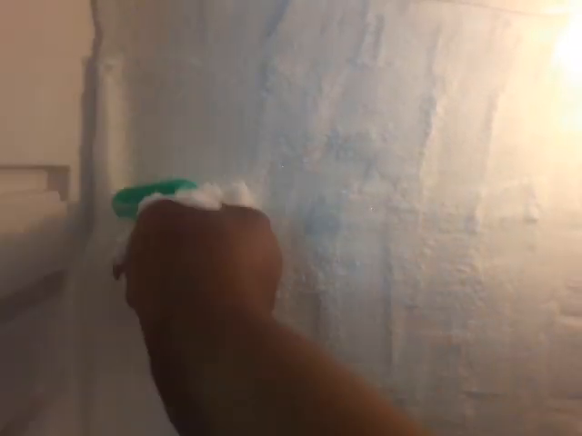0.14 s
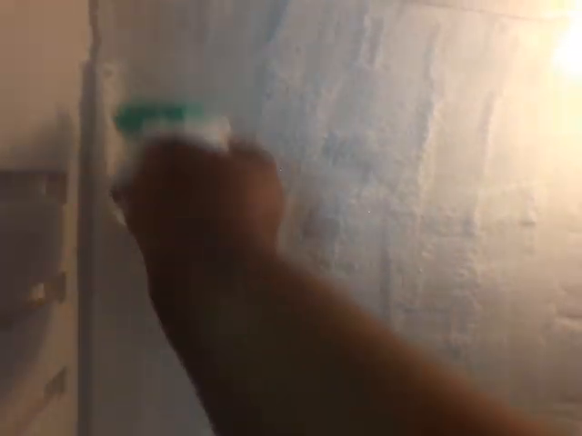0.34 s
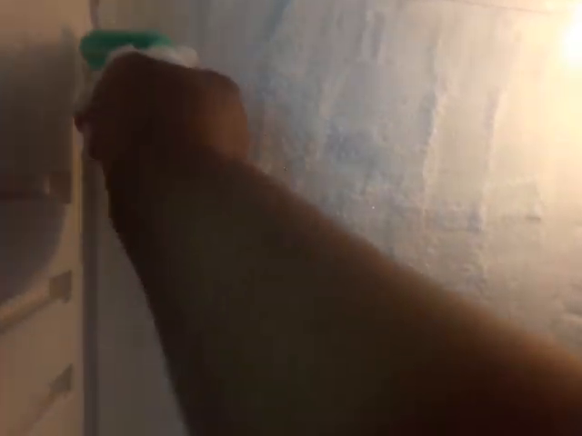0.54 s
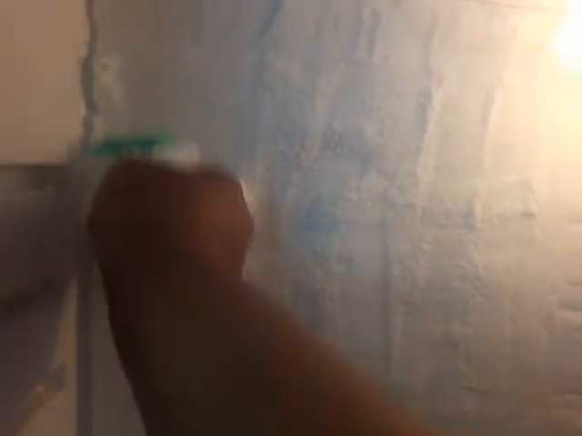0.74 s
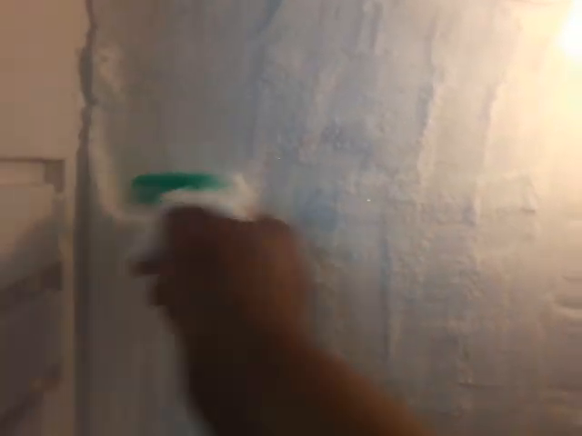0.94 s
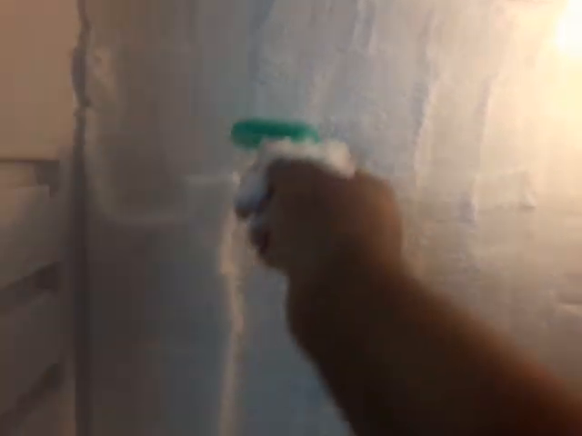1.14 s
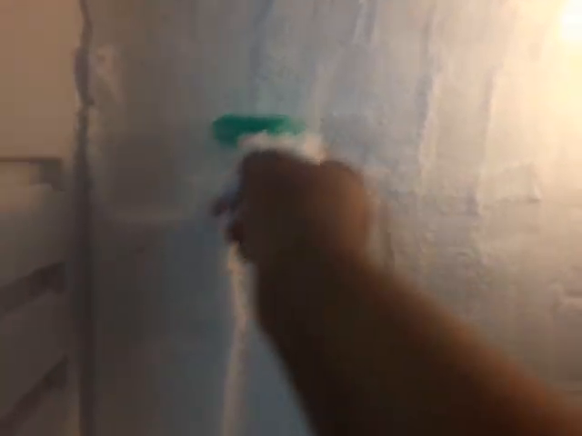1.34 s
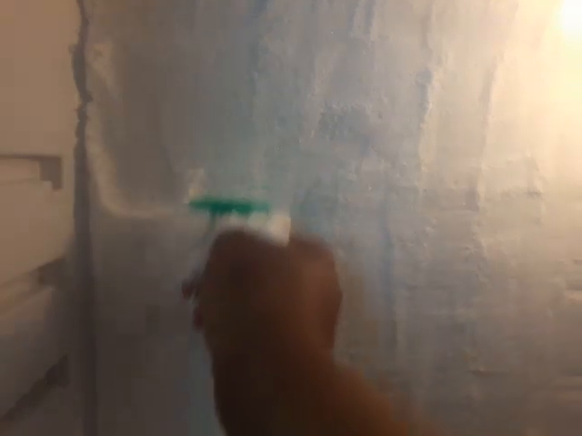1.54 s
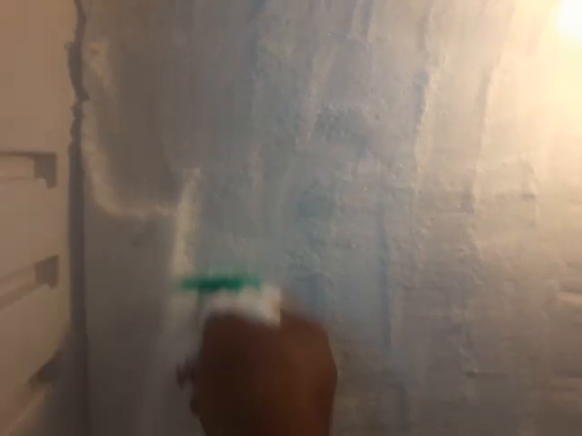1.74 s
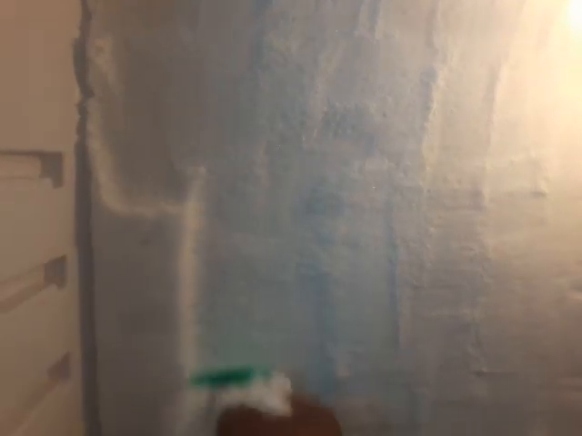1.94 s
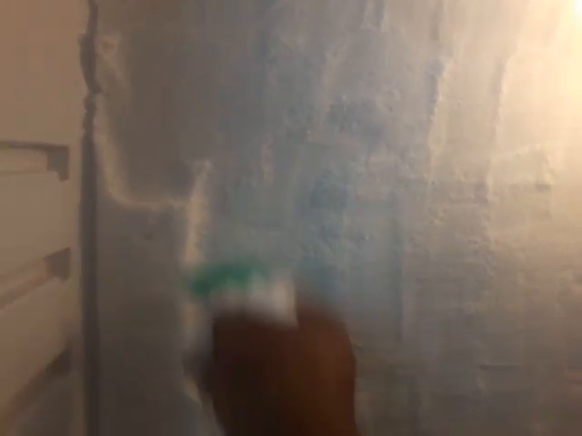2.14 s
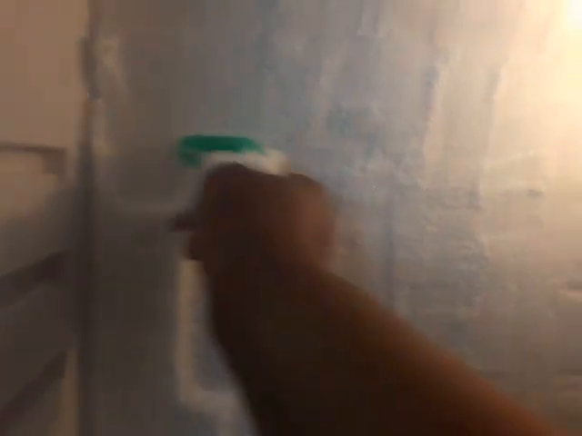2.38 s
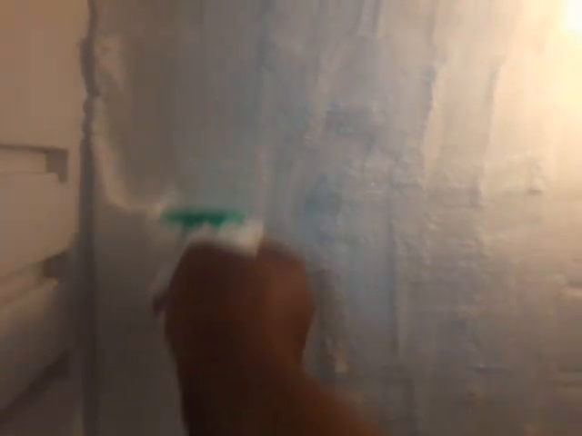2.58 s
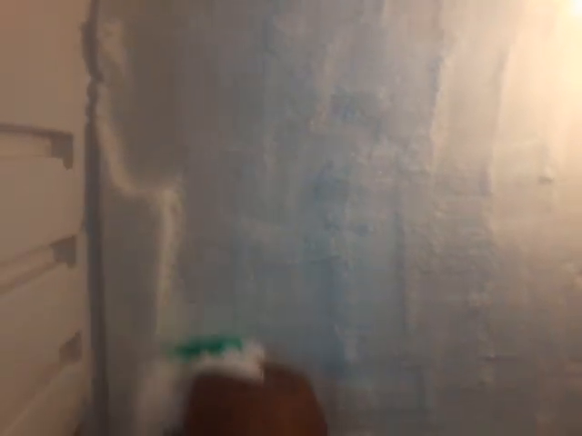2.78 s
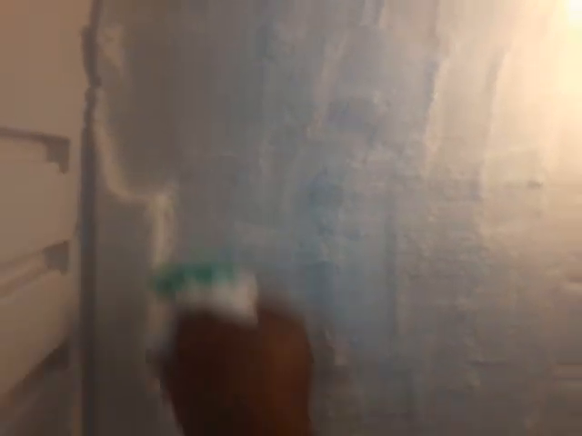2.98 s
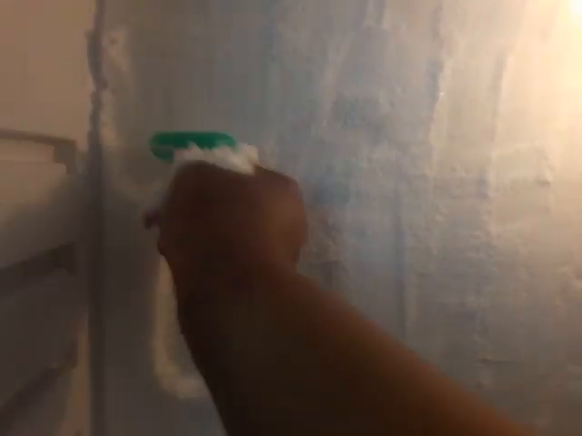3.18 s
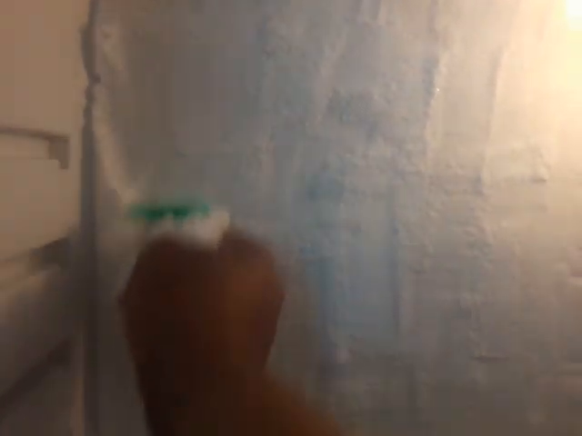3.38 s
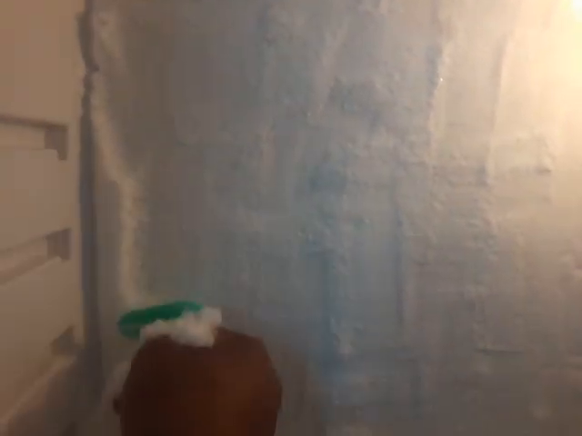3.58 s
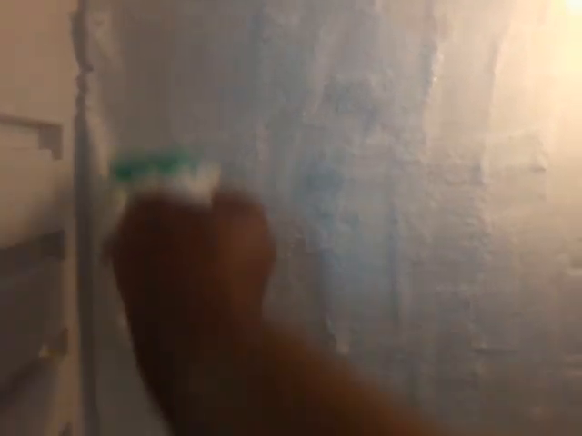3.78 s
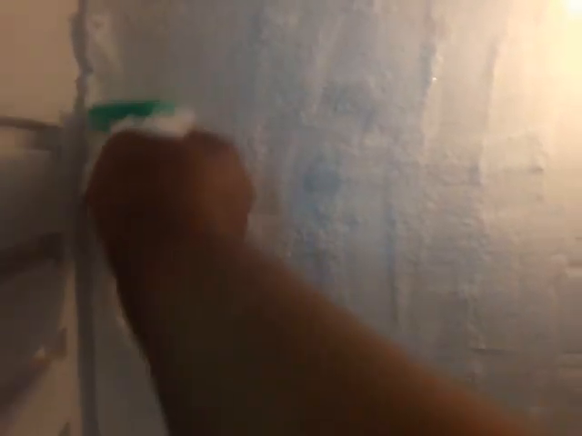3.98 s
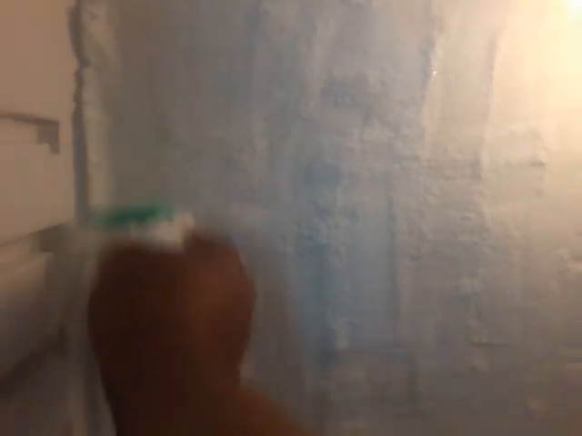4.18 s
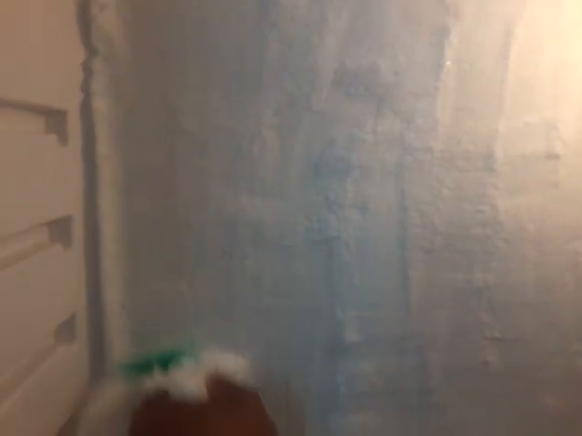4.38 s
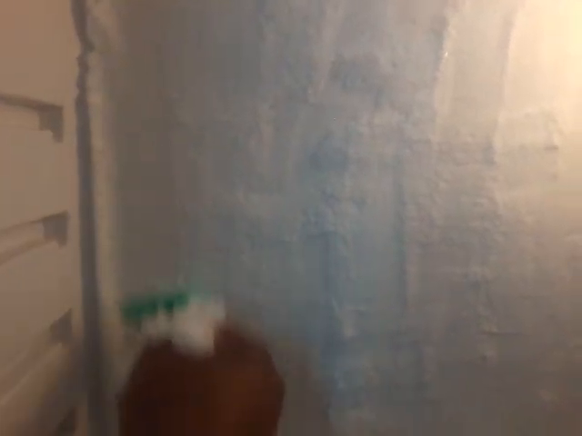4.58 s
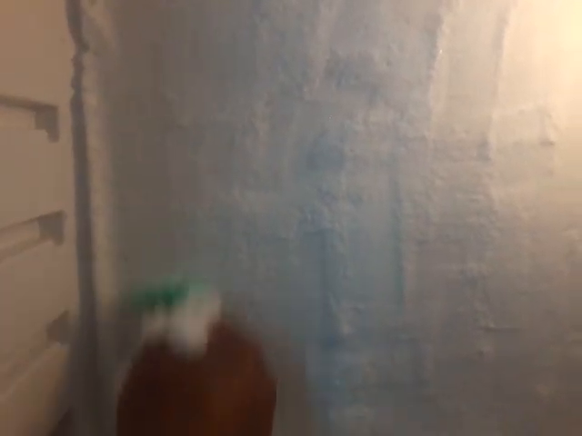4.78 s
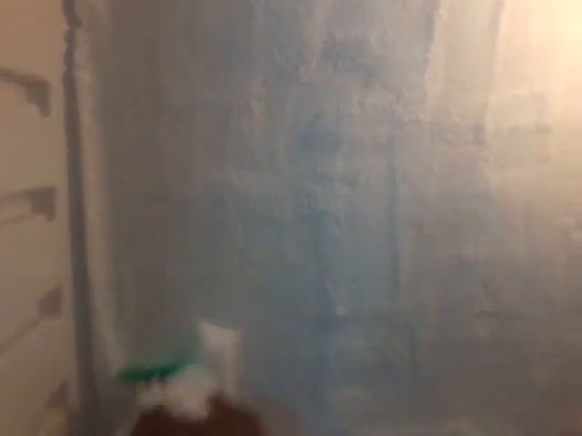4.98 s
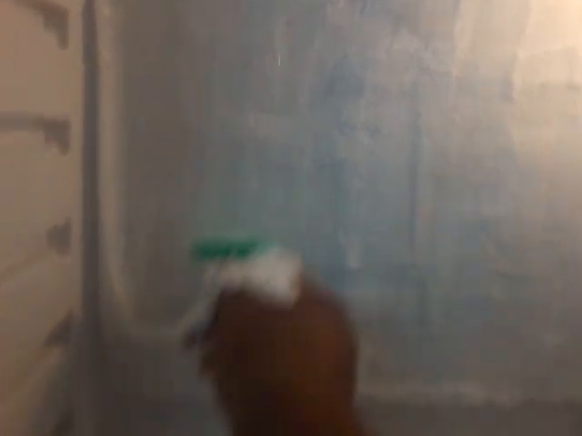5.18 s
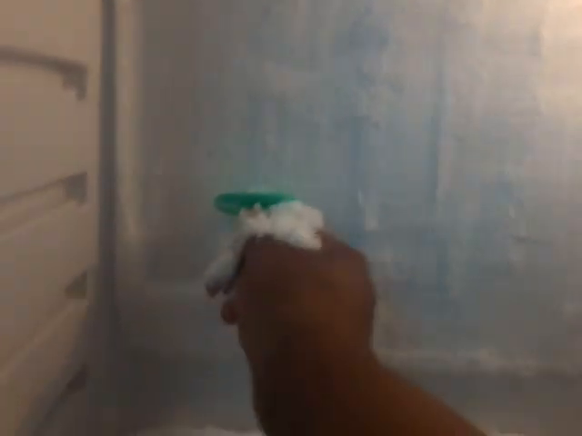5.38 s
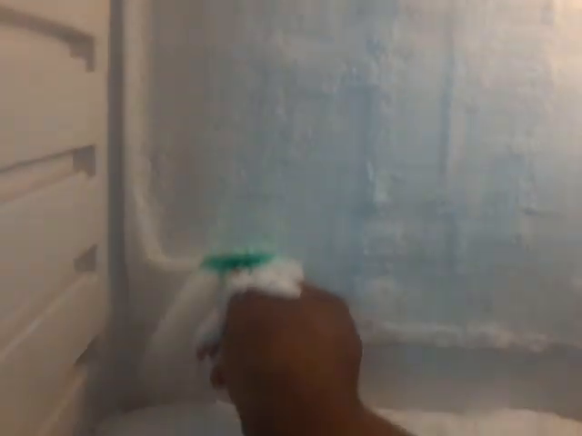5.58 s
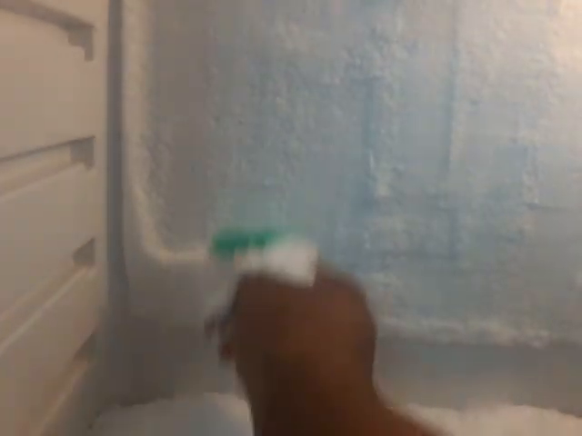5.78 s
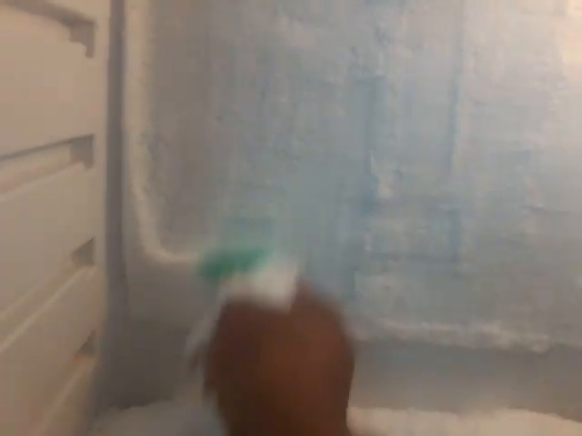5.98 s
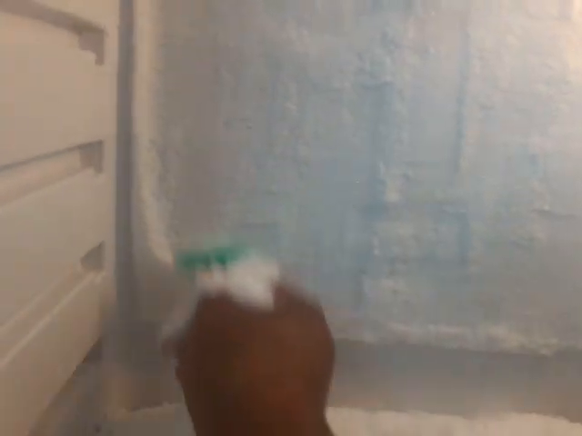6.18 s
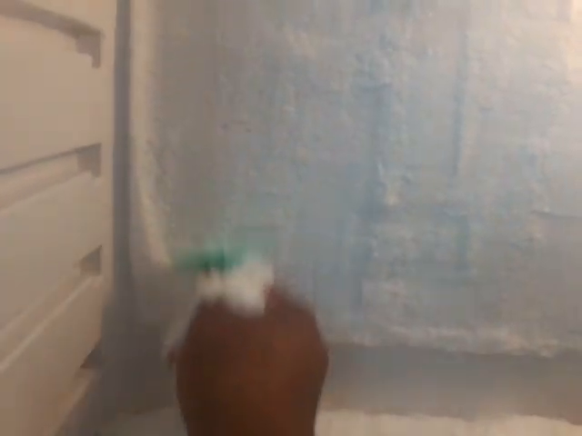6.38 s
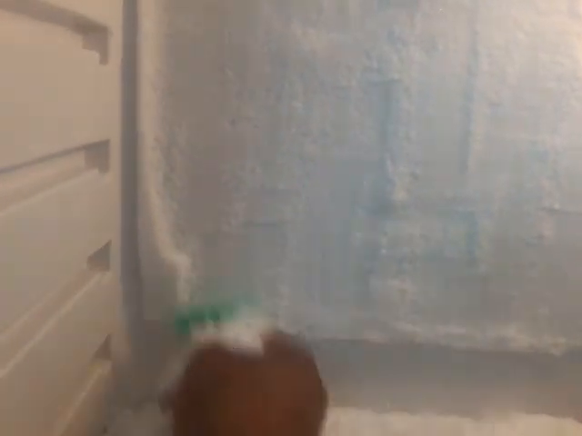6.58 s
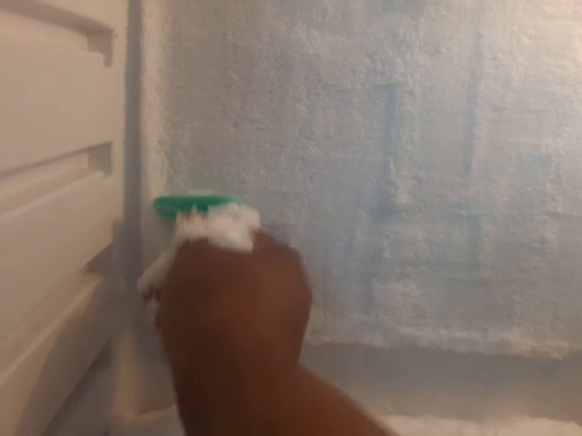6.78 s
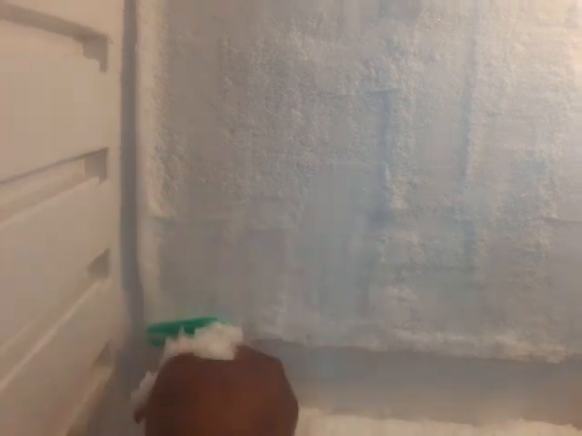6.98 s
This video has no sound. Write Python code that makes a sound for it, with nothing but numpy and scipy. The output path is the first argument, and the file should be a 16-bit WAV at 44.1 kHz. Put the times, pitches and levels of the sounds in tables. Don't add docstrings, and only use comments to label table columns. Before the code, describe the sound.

Inside an open freezer, a small blade scrapes thick frost in repeated rasping strokes, each starting duller and clearing into crisp crunch. The panel behind answers with low, boxy drumming. Strong snaps come around the middle, then strokes become shorter and closer. Ice crumbs chink and powder trickles in the gaps. Quiet motor rumble and short hard reflections surround it, picked up closely by a small mono microphone.

```python
import sys
import numpy as np
from scipy import signal
from scipy.fft import rfft, irfft, next_fast_len
from scipy.io import wavfile
from scipy.ndimage import uniform_filter1d, map_coordinates

SR = 44100
rng = np.random.default_rng(int(sys.argv[2]) if len(sys.argv) > 2 else 0)


def to_linear_factor(level_db):
    exponent = np.asarray(level_db, float) / 20
    return 10 ** exponent


def transcribe(u):
    v = np.clip(np.atleast_2d(u).T, -1, 1)
    q = np.round(v * 32767).astype(np.int16)
    wavfile.write(sys.argv[1], SR, q)


N = 310023


def unit(x):
    return x / np.sqrt(np.mean(x ** 2) + 1e-20)


def along(points, hz):
    f, v = np.transpose(points)
    return np.interp(np.log(hz + 1), np.log(f + 1), v)


def lifts(peaks, hz):
    return sum(db / (1 + (2 * (hz - centre) / width) ** 2) for centre, width, db in peaks)


def filtered(x, response):
    size = next_fast_len(N + SR // 2)
    hz = np.fft.rfftfreq(size, 1 / SR)
    return irfft(rfft(x, size) * response(hz), size)[:N]


def causal(gain_db):
    cepstrum = irfft(np.log(to_linear_factor(gain_db) + 1e-6))
    half = len(cepstrum) // 2
    cepstrum[1:half] *= 2
    cepstrum[half + 1:] = 0
    return np.exp(rfft(cepstrum))


def modes(table):
    def response(f):
        total = 0
        for k, (centre, width, db) in enumerate(table):
            resonance = 1j * f * width / (centre * centre - f * f + 1j * f * width)
            total = total + (-1) ** k * to_linear_factor(db) * resonance
        return total
    return response


def driven(force, level, response):
    return filtered(level * force, response) / np.std(filtered(force, response))


def wobble(rate):
    knots = rng.standard_normal(int(N * rate / SR) + 4)
    return map_coordinates(knots, [np.arange(N) * rate / SR])


def crystals(per_s, spread_db, clump_db):
    happens = rng.random(N) < per_s / SR
    size = rng.standard_normal(N) * to_linear_factor(spread_db * rng.standard_normal(N))
    return unit(happens * size * to_linear_factor(clump_db * wobble(150)))


# hz [Hz], level_db [dB per Hz]
AIR = [(15, -43.5), (25, -16), (166, -0.5), (223, -6.5), (242, -16), (354, -10.5), (394, -18), (641, -21),
       (754, -20), (840, -28.5), (2000, -28.5), (7920, -47), (16000, -51)]
# centre_hz [Hz], width_hz [Hz], lift_db [dB]
MOTOR = [(69, 10, 0.5), (138, 20, 8), (210, 5.7, 9.5), (732, 19, 9.5)]


def rumble():
    noise = rng.standard_normal(N)
    return to_linear_factor(-47.5) * unit(filtered(noise, lambda hz: to_linear_factor(along(AIR, hz) + lifts(MOTOR, hz))))


def tail(t60_of, seconds):
    hz, t, z = signal.stft(rng.standard_normal(int(seconds * SR)), SR, nperseg=256)
    decay = to_linear_factor(-60 * t / t60_of(hz)[:, None])
    response = signal.istft(z * decay, SR, nperseg=256)[1]
    return response / np.linalg.norm(response)


def moving_echo(x, t60_of, seconds, count):
    out, hop = np.zeros(N + 3 * SR), N // count
    padded = np.pad(x, hop * 2)
    for start in range(-hop, N, hop):
        piece = padded[start + 2 * hop:][:2 * hop] * np.hanning(2 * hop)
        wet = signal.fftconvolve(piece, tail(t60_of, seconds))[max(-start, 0):]
        out[max(start, 0):][:len(wet)] += wet
    return out[:N]


# hz [Hz], t60_s [s]
KITCHEN_T60 = [(150, 0.33), (600, 0.69), (2500, 0.51), (6000, 0.34), (15000, 0.3)]


def echoes(x):
    cabinet_t60 = [(200, 0.063), (2000, 0.066), (12000, 0.025)]  # hz, t60_s
    cabinet = moving_echo(x, lambda hz: along(cabinet_t60, hz), seconds=.12, count=40)
    kitchen = moving_echo(x, lambda hz: along(KITCHEN_T60, hz), seconds=.7, count=20)
    return to_linear_factor(-9) * cabinet + to_linear_factor(-18) * kitchen


# start_s [s], length_s [s], level_db [dB]
TRICKLES = [(.25, 0.34, -50), (.98, 0.28, -55.5), (2.927, 0.28, -58), (3.675, 0.24, -51.5),
            (4.547, 0.3, -60), (5.062, 0.3, -62), (6.14, 0.17, -67), (6.6, 0.32, -60)]


def powder():
    t, level, thins_db_per_s = np.arange(N) / SR, np.zeros(N), 48
    for start, length, db in TRICKLES:
        fade = np.clip(np.minimum((t - start) / .02, (start + length - t) / 0.058), 0, 1)
        level += fade * to_linear_factor(db - thins_db_per_s * np.abs(t - start))
    grains = crystals(per_s=6600, spread_db=-0.5, clump_db=2.5) * to_linear_factor(1.6 * wobble(46))
    hiss = [(800, -13.0), (2500, 1), (9000, -4.0), (16000, -6)]  # hz, level_db
    return driven(grains, level, lambda hz: causal(along(hiss, hz)))


CRUMB_T60_S = 0.038
# start_s [s], puff_db [dB], pitch_hz [Hz], ring_db [dB over the puff]
FALLING_CRUMBS = [(.268, -26, 10900, -6), (0.318, -30, 1210, -2), (.346, -32, 5900, -23.5),
                  (.378, -37.5, 1980, 2.5), (.419, -37.5, 2340, -4), (.449, -47.5, 5000, -9),
                  (.472, -41.5, 2000, -1.5), (.513, -53, 5800, 2), (.642, -47, 4000, 2.5),
                  (1.03, -43, 2080, -3), (1.063, -37, 5000, -16), (1.086, -46, 5000, -6),
                  (1.098, -39, 6000, -13), (1.115, -42, 6950, -13), (1.208, -50, 5900, -5.5),
                  (3.179, -40, 8700, 4), (3.232, -54, 2130, 14), (3.705, -39, 1780, 9),
                  (3.768, -29, 3090, -6), (3.786, -33, 2380, -4.5), (3.831, -38, 2100, -3.5),
                  (4.62, -41.5, 1900, -6), (4.719, -44.5, 3070, -7), (5.175, -44, 7230, -4),
                  (6.169, -36, 7260, -2), (6.202, -30.5, 5150, -2), (6.761, -35, 5970, -0.5),
                  (6.762, -46, 2640, 11), (6.801, -50, 2300, 16)]


def crumb_rings():
    t, out = np.arange(SR // 12) / SR, np.zeros(N + SR)
    for start, db, pitch_hz, ring_db in FALLING_CRUMBS:
        jitter = .13 * np.cumsum(rng.standard_normal(len(t)))
        decay = to_linear_factor(db + ring_db - 4.5 - 60 * t / CRUMB_T60_S)
        out[round(start * SR):][:len(t)] += decay * np.sin(2 * np.pi * pitch_hz * t + jitter)
    return out[:N]


# start_s [s], peak_db [dB], panel_db
# [dB], rise_s [s], dull [0-1]
RIDGES = [(.694, -13, -8, .002, 0), (.661, -24, -10, .02, 0.2), (.736, -15.5, -9, .002, 0.26),
          (.748, -18, -14, 0.0016, 0.3), (1.36, -20, -6, .013, .2), (1.394, -27.5, 9, 0.0033, 0.8),
          (1.451, -14.5, 8, 0.0045, 1), (2.439, -13, -4.5, 0.025, 0.04), (2.806, -6.5, -18.5, .002, 0.17),
          (3.179, -32.5, 2.5, 0.0014, 0.14), (3.286, -12.5, -4, .013, 0), (3.59, -2.5, -11, .002, 0.47),
          (3.616, -5.5, -16, .012, 0.6), (4.009, -13.5, 0, 0.0099, 0.06), (4.811, -31, 11.5, 0.0067, 0.4),
          (5.482, -31, 12.5, 0.023, 0.5), (5.954, -14, 0.5, 0.014, 0), (6.398, -21.5, -3.5, 0.009, 0),
          (6.849, -13.5, -4.5, 0.03, 0.06), (6.91, -15, 1, 0.0015, 0.57)]
# centre_hz [Hz], width_hz [Hz], level_db [dB]
LOW_PANEL = [(130, 9.8, -1), (157.2, 11.6, 7), (167, 19, -7)]
# centre_hz [Hz], width_hz [Hz], level_db [dB]
MAIN_PANEL = [(196.5, 20.6, -5.5), (225.7, 14, 1.5), (241.2, 28, -13.5)]
# centre_hz [Hz], width_hz [Hz], level_db [dB]
UPPER_PANEL = [(304.7, 20, 2), (366, 30, 0), (435, 22, -1), (487, 27.7, -1), (527.4, 26, 2),
               (585.2, 38, 3.5), (719, 79, 0)]


def pushes():
    blows, push_db, lag_s = np.zeros(N), 34.5, .003
    for start, db, panel_db, _, _ in RIDGES:
        blows[round((start + lag_s) * SR)] = to_linear_factor(db + panel_db + push_db)

    def panel(hz):
        return to_linear_factor(-4.5) * modes(LOW_PANEL)(hz) + modes(MAIN_PANEL)(hz) + to_linear_factor(-8) * modes(UPPER_PANEL)(hz)
    return filtered(blows, panel)


def burst_levels(table, t60):
    t, out = np.arange(SR // 4) / SR, np.zeros((3, N + SR))
    for start, db, panel_db, rise, dull in table:
        shape = np.minimum(t / rise, 1) ** 0.78 * to_linear_factor(db - 9.0 - 60 * np.maximum(t - rise, 0) / t60)
        shape = shape * (1 + dull * to_linear_factor(-60 * t / 0.0081))
        gains = np.array([[1 - dull], [dull], [to_linear_factor(panel_db)]])
        out[:, round(start * SR):][:, :len(t)] += shape * gains
    return out[:, :N]


# start_s [s], stop_s [s], crunch_db [dB], speeding_up_s [s], slowing_down_s [s]
BLADE_STROKES = [(-.1, 0.266, -18.5, 0.093, 0.17), (0.688, 0.992, -19, 0.086, 0.13),
                 (1.385, 2.109, -21, 0.095, 0.088), (2.483, 2.939, -20, 0.074, 0.11),
                 (3.313, 3.688, -19.5, 0.04, 0.1), (4.035, 4.553, -19, 0.071, 0.11),
                 (4.81, 5.064, -18, 0.071, .1), (5.481, 5.778, -20, 0.083, .075),
                 (5.98, 6.155, -19, 0.051, 0.048), (6.397, 6.614, -19.5, 0.051, 0.051),
                 (6.892, 7.15, -19, 0.049, .1)]
# [upper mode, Hz]
WALL_PLACES = [(0.5, -17, -7.5, -0.5, 510), (5, -16, -10, -0.5, 530), (1.5, -8, -3.5, -1, 427),
               (2.5, -8, -4, 0, 520), (1, -8.5, -6.5, -2.5, 464), (0, -12.5, -5, -2.5, 510),
               (-0.5, -10.5, -8.5, -4.5, 490), (-6.5, -9.5, -3, -0.5, 508), (-1, -10, -5, -5, 465),
               (0, -7.5, -0.5, 1.5, 500), (-2.5, -10.5, -7, -4.5, 475)]
# [drumming mid-stroke, dB]
PANEL_DRIFTS = [(6, -11, 0.5, 1.5), (5, 6, -9, 1.5), (-4.5, 0, -10.5, 4), (-2, -7.5, -5, 2),
                (13.5, 4, -3.5, 1.5), (6, 0, -13, 2.5), (-1, -10, -1, -3), (11, -3.5, -5.5, -3),
                (-6, -14, 3.5, 0.5), (14, 9, -4, -2.5), (6, 4.5, -5, 2.5)]
BLADE_RING_DB = [-19, -26, -19, -20, -20, -18, -11, -19, -21, -21, -19]
# time_s [s], half_width_s [s], change_db [dB]
HANGS = [(3.582, .006, -9), (2.8, .005, -2), (.731, 0.002, 4)]


def stroke_levels():
    t, out, spot_hz = np.arange(N) / SR, np.zeros((6, N)), np.full(N, 490.)
    wander = np.array([wobble(14) for _ in range(4)])
    starting_db, stopping_db, mid_share = [6.5, 6.5, 1.5], [3, -4, -1.5], [1.1, .9, .3]
    for stroke, place, drift, ring_db in zip(BLADE_STROKES, WALL_PLACES, PANEL_DRIFTS, BLADE_RING_DB):
        start, stop, db, up_s, down_s = stroke
        gains_db, *groups_db, favoured_hz = place
        *drifts_db, mid_db = drift
        now = slice(max(round(start * SR), 0), round(stop * SR))
        since, left = t[now] - start, stop - t[now]
        starting = np.clip(1 - since / up_s, 0, 1) ** 1.28
        stopping = np.clip(1 - left / down_s, 0, 1) ** 1.84
        down = since / (stop - start) - .5
        touch = np.clip(np.minimum(since / 0.0033, left / 0.014), 0, 1)
        crunch = touch * to_linear_factor(db + gains_db * down - 18.5 * starting - 21.5 * stopping)
        dull = np.clip(0.049 + 0.3 * np.exp(-since / 0.17), 0, 1)
        middle = mid_db * (.5 + .5 * np.cos(2 * np.pi * down))
        panel = []
        for k in range(3):
            speed_db = starting_db[k] * starting + stopping_db[k] * stopping
            place_db = groups_db[k] + drifts_db[k] * down + mid_share[k] * middle
            panel.append(to_linear_factor(speed_db + place_db + 1.44 * wander[k, now]))
        ring = np.full(len(down), to_linear_factor(ring_db))
        out[:, now] = crunch * np.array([1 - dull, dull, *panel, ring])
        spot_hz[now] = favoured_hz * np.exp(0.067 * wander[-1, now])
    stall_db = sum(db * np.exp(-((t - s) / width) ** 2) for s, width, db in HANGS)
    return out * to_linear_factor(stall_db), spot_hz


def moving_spot(x, depth_db):
    z = signal.stft(x, nperseg=1024)[2]
    field = uniform_filter1d(rng.standard_normal(z.shape), size=4, axis=0)
    field = uniform_filter1d(field, size=6, axis=1)
    return signal.istft(z * to_linear_factor(depth_db * unit(field)), nperseg=1024)[1][:N]


def locked(force, response, grip):
    swing = filtered(force, response)
    swing = swing / np.sqrt(np.abs(uniform_filter1d(swing ** 2, size=1500)) + 1e-12)
    return force + grip * swing


# hz [Hz], level_db [dB per Hz]
CRUNCH_SPECTRUM = [(600, -13.5), (900, -3.5), (1500, -4), (3000, -5), (4000, -8), (5000, -7.5),
                   (6000, -3.5), (7500, -4), (9000, -5), (10500, -13), (12500, -13), (16000, -17)]
# centre_hz [Hz], width_hz [Hz], lift_db [dB]
BLADE_PEAKS = [(1001, 35, 2.5), (1146, 50, 4.5), (2133, 50, 2.5), (2544, 83, -1), (4220, 610, 3),
               (6950, 1100, 0.5), (8700, 500, -1)]
# centre_hz [Hz], width_hz [Hz], level_db [dB]
BLADE_RING = [(2326, 750, 0)]


def scraping():
    (crunch, grind, low, main, upper, ring), spot_hz = stroke_levels()
    puffs = [(start, db, -11.5, .002, 0) for start, db, _, _ in FALLING_CRUMBS]
    snap, thud, knock = burst_levels(RIDGES, t60=0.058) + burst_levels(puffs, CRUMB_T60_S)

    def edge(hz):
        return causal(along(CRUNCH_SPECTRUM, hz) + lifts(BLADE_PEAKS, hz))

    def dull_edge(hz):
        return edge(hz) / (1 + 1j * hz / 6000) ** 3

    def stiff(hz):
        return modes(LOW_PANEL)(hz) / (1 - 1j * 95 / (hz + 1)) ** 2

    judder = to_linear_factor(0.28 * wobble(40))
    fine = judder * moving_spot(crystals(per_s=15000, spread_db=1.0, clump_db=0.4), depth_db=2.5)
    coarse = judder * moving_spot(crystals(per_s=3500, spread_db=2.0, clump_db=-0.33), depth_db=1.5)
    sound = driven(fine, crunch + snap, edge) + driven(fine, grind + thud, dull_edge)
    sound += driven(fine, ring, lambda hz: modes(BLADE_RING)(hz) ** 2)
    sound += pushes()
    sound += driven(locked(coarse, stiff, grip=0.049), low + to_linear_factor(-11.0) * knock, stiff)
    main_body = modes(MAIN_PANEL)
    sound += driven(locked(coarse, main_body, grip=0.06), main + to_linear_factor(-2) * knock, main_body)
    for k, (hz, width, db) in enumerate(UPPER_PANEL):
        far_db = np.minimum(14 * np.abs(np.log2(hz / spot_hz)), 8)
        level = to_linear_factor(db - 6.0 - far_db) * (upper + to_linear_factor(1.0) * knock)
        sound += (-1) ** k * driven(coarse, level, modes([(hz, width, 0)]))
    return filtered(sound, lambda hz: 1 / (1 - 1j * 70 / (hz + 1)) ** 2)


def scene():
    near = scraping() + crumb_rings() + powder()
    return (to_linear_factor(-1.0) * near + echoes(near) + rumble())[None]


# hz [Hz], level_db [dB]
BASS_ROLL_OFF = [(20, -15), (40, -2.5), (65, 1.5)]
# centre_hz [Hz], width_hz [Hz], lift_db [dB]
PORT_NOTCH = [(8000, 360, -9.5)]


def microphone(hz):
    band_limit = np.clip((15850 - hz) / 160, 0, 1) ** 2
    return causal(along(BASS_ROLL_OFF, hz) + lifts(PORT_NOTCH, hz)) * band_limit


def roll_off(x):
    return signal.sosfilt(signal.butter(12, 16430, fs=SR, output="sos"), x)


def record(dry):
    heard = filtered(dry[0], microphone)
    return roll_off(heard[None])


dry = scene()
out = record(dry)
transcribe(out)
```